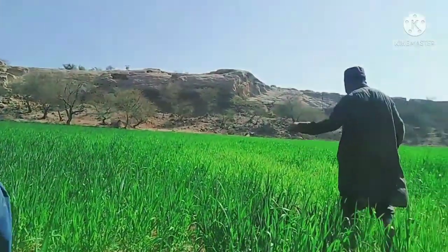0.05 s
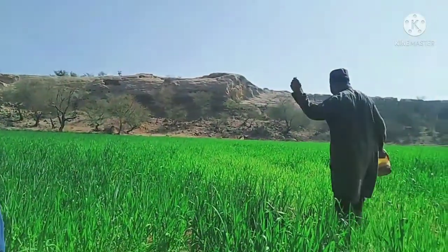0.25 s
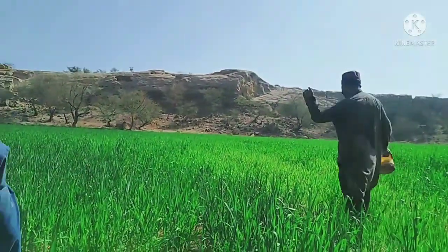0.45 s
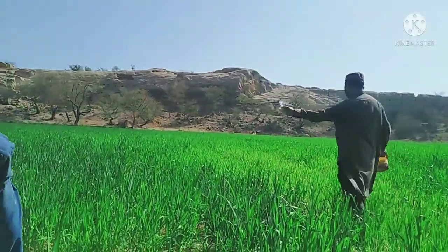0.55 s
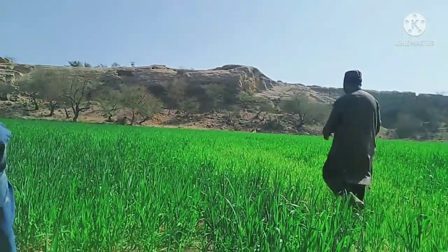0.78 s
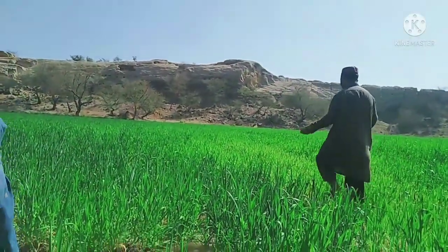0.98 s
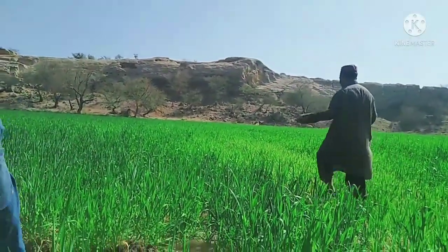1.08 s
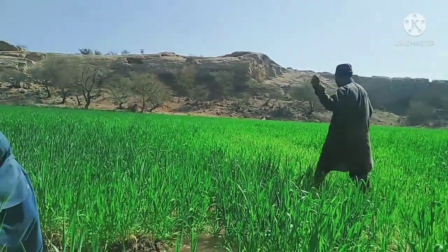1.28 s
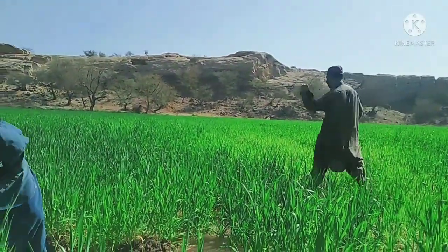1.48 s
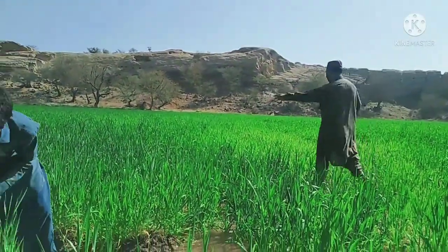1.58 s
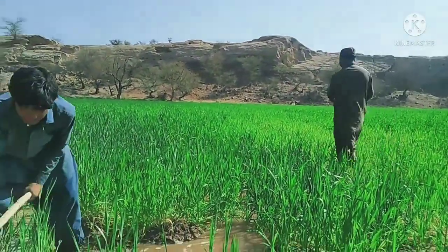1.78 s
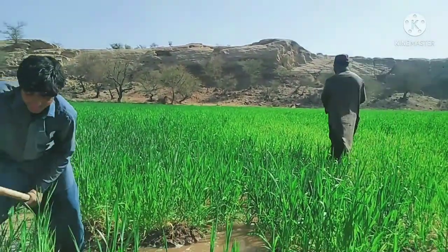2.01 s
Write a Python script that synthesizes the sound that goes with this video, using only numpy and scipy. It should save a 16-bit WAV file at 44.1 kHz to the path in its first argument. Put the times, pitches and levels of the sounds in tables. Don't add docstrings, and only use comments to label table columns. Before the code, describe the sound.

A hoe chops into wet mud in an open field. Faint hiss, stalk rustle and blade drag open; at 0.2 s a crisp, gritty blow with a short metallic ring. Small clods plop at 0.4-0.6 s, then soft scraping and rustling. At 1.35 s a duller, wetter chop lands, with splats and snaps near 1.42 and 1.7 s, fading into rustle by 2 s. Close, dry, no echo.

```python
import sys
import numpy as np
from scipy import signal
from scipy.fft import rfft, irfft
from scipy.io import wavfile
from scipy.ndimage import uniform_filter1d

SR = 44100
rng = np.random.default_rng(int(sys.argv[2]) if len(sys.argv) > 2 else 0)


def volts_from_decibels(level):
    exponent = np.asarray(level, float) / 20
    return 10 ** exponent


def materialize(psi):
    bounded = np.clip(np.atleast_2d(psi).T, -1, 1)
    quanta = np.round(bounded * 32767).astype(np.int16)
    wavfile.write(sys.argv[1], SR, quanta)


N = 90404

# (frequency [Hz], density [dB per Hz])
AIR_SPECTRUM = [(20, 23), (45, 2.5), (90, 7), (300, -3), (1000, -5), (2000, -24), (5000, -28), (16000, -12)]
AIR_DB = -61.5

# (time [s], rustle level [dB], scrape level [dB], scrape pitch [Hz])
MOVEMENT = [(0, -59, -66.5, 1280), (.05, -67, -69, 1520), (.3, -70, -87, 1510), (.42, -68.5, -74.5, 1530),
            (.55, -63.5, -74.5, 1515), (.63, -67, -65, 1800), (.7, -70.5, -65, 2050),
            (.8, -57.5, -69, 2570), (.95, -59.5, -66.5, 2500), (1.08, -64.5, -65.5, 1760),
            (1.171, -72.5, -66.5, 1700), (1.25, -72, -79, 1770), (1.34, -80, -74.5, 1780),
            (1.4, -61, -64, 1800), (1.63, -58, -63, 1800), (1.73, -64.5, -71.5, 1400),
            (1.8, -56.5, -73, 1500), (2.05, -63.5, -110, 1508)]
# (time [s], level [dB])
HOLLOW_LEVEL = [
    (0, -70),
    (.2, -76),
    (.35, -85),
    (.62, -70.5),
    (.8, -70),
    (1.1, -73),
    (1.25, -86),
    (1.45, -73),
    (1.7, -74),
    (2.05, -88),
]
# (frequency [Hz], density [dB per Hz])
RUSTLE_SPECTRUM = [(60, 4), (300, -11.5), (700, 1), (2000, -0.5), (5000, -4), (10000, -1.5), (16000, -2.5)]
SCRAPE_WIDTH_HZ, HOLLOW_HZ, HOLLOW_WIDTH_HZ = 1650, 559, 41
CORE_WIDTH_HZ, CORE_DB = 96, -5.5
WAVER, SWAY_DB, SWAY_S = 0.042, 1.5, 0.026

# (time [s], peak level [dB], pitch [Hz],
# length [cycles])
TICKS = [(0.0374, -39, 14500, 10), (0.187, -35, 10200, 10), (0.6667, -33.5, 2300, 0.7),
         (0.63, -42, 1620, 1.2), (0.6937, -39, 1660, 6.2), (0.741, -46.5, 1800, 3.7),
         (1.5724, -31, 4700, 2.1), (1.6832, -29.5, 1320, 1.02), (1.6662, -38, 1700, 3),
         (1.7034, -34, 440, .8), (1.364, -27, 1900, 4), (1.3502, -13, 2630, 1), (.2525, -45, 2400, 2),
         (.2076, -14, 1900, 2.5), (1.7036, -40, 1700, 2), (.4675, -41, 2250, 8), (.4655, -44, 3350, 9),
         (.4235, -39, 1200, 4), (.424, -46, 3900, 10), (1.878, -41.5, 7500, 3.9), (.4575, -40, 2400, 1.8),
         (1.8621, -32.5, 4160, 3.1), (1.922, -49.5, 1480, 4.4), (2.001, -47.5, 2230, 1.8),
         (1.4185, -35, 8100, 11), (1.4198, -33, 7500, 14), (1.4482, -32.5, 8250, 16), (1.422, -39, 1800, 9),
         (1.4225, -34.5, 3140, 10), (1.7034, -31.5, 7600, 4.7)]

# (time [s], peak level [dB], lower edge [Hz], T60 [s])
SNAPS = [(0.0379, -44, 3500, 0.005), (0.0963, -45, 1000, .004), (0.1348, -46, 3000, 0.0045),
         (0.1874, -38, 7000, 0.034), (0.727, -38.5, 8100, 0.006), (0.9064, -35, 4500, 0.0093),
         (1.38, -30.5, 4010, 0.0097), (1.6028, -29, 3770, 0.005), (1.6833, -28.5, 4000, 0.004),
         (1.7035, -48, 301, 0.0039), (1.4185, -25, 4500, 0.01), (1.4480, -27, 4000, 0.012),
         (.4567, -36.5, 2000, 0.0086), (1.8265, -39, 6070, 0.006)]
SNAP_TOP_HZ = 14500

# (time [s], level [dB], rise [s], hold [s], T60 [s])
BLOWS = [
    (.2074, -23.5, 0.0014, 0.00082, 0.025),
    (1.3470, -25, 0.0024, 0.0086, 0.026),
]
# (level [dB], T60 [s])
AFTER_SPRAY = [
    (-32, 0.11),
    (-43.5, 0.45),
]
# (frequency [Hz], density [dB per Hz])
GRIT_SPECTRUM = [(100, 20), (500, 17), (2000, 9), (5000, 2.5), (10000, 0), (16000, -5)]
# (frequency [Hz], level [dB], T60 [s])
FIRST_MODES = [(105, 0, 0.04), (330, 1.5, 0.071), (454.5, 1, 0.063), (651, 0, 0.073), (917, -5.5, 0.039),
               (1116, 0, 0.045), (1222, 2, 0.047), (1595, -5, 0.04), (1820, -5, 0.043), (2000, -8, 0.049),
               (2286, -8, .04), (2465, -10, 0.042), (3080, -6.5, 0.029), (3923, 7.5, 0.018)]
# (frequency [Hz], level [dB], T60 [s])
SECOND_MODES = [(105, -10, 0.06), (177, -1, 0.092), (279, -1, 0.055), (357, -3, 0.063), (425, -11, 0.048),
                (590, -9, 0.035), (650, -8, 0.042), (720, -10, 0.043), (830, -10, 0.035),
                (1089, -8.5, 0.039), (1770, -14, 0.048), (2060, -17.5, 0.065), (2967, -7, 0.026),
                (4700, -17, 0.018)]
# (frequency [Hz], level [dB], T60 [s])
BLADE_MODES = [
    [(7200, -61, .03), (7250, -27, 0.022), (8550, -17.5, 0.0077), (14210, -14, 0.008), (15500, -18, .008),
     (13300, -21, 0.011), (10380, -29.5, 0.016)],
    [(7310, -33, 0.02), (7700, -25, 0.019), (8840, -45, 0.012), (14300, -41, 0.013), (2330, -34, .025),
     (3390, -28.5, 0.035), (3870, -30, .025), (5080, -28, 0.021), (6240, -27, 0.022), (8160, -28, 0.019)],
]
MODE_LAG_S = [.0005, .0028]
MODES_DB, PUSH_S = [-26.5, -19], [0.00096, 0.002]
IN_STEP_BELOW_HZ = 800

# (time [s], level [dB], pitch [Hz], rise [s], T60 [s])
KNOCKS = [(.214, -34.5, 201, 0.0048, 0.23), (0.1977, -49, 3920, 0.001, 0.018),
          (1.3580, -30, 278, 0.0024, 0.03), (1.375, -34, 379, .004, 0.059),
          (.418, -39.5, 186, 0.0054, 0.067), (0.474, -52, 204, 0.014, 0.3),
          (0.585, -51.5, 154.6, 0.0048, 0.22), (.68, -60, 205.4, 0.066, 0.56),
          (1.419, -28, 173, 0.0079, 0.04), (1.445, -35, 156, 0.0029, 0.072),
          (1.469, -58.5, 159.6, 0.053, 0.89), (1.48, -66, 388, .02, 1), (1.662, -41.5, 101, 0.0046, 0.049),
          (1.79, -39.5, 390, 0.012, 0.039)]

# (time [s], length [s], mud body level [dB], spray level [dB], body pitch [Hz])
CLODS = [(0.4156, 0.019, -51.5, -51, 596), (0.432, 0.023, -55.5, -57, 800), (0.4975, .003, -61, -62, 900),
         (0.422, 0.0071, -46.5, -59, 890), (0.4561, 0.0055, -51.5, -49.5, 700),
         (0.4626, 0.0093, -50.5, -51.5, 1540), (0.47, 0.016, -53, -54, 1154),
         (0.5876, 0.019, -61.5, -58, 1090), (0.574, 0.029, -73, -61, 930),
         (0.601, 0.011, -58.5, -57.5, 1200), (.609, 0.015, -63.5, -54.5, 1300),
         (0.612, 0.021, -56.5, -80, 448), (1.382, 0.0037, -63, -64, 1500),
         (1.419, 0.0073, -46.5, -50, 2300), (1.417, 0.015, -44.5, -55, 480), (1.4408, .005, -58, -50, 1490),
         (1.4477, 0.0077, -44, -41.5, 907), (1.455, 0.01, -55, -56, 905), (1.641, 0.023, -58, -68, 890),
         (1.654, 0.01, -61, -65, 1400), (1.665, 0.016, -55, -66, 1200), (1.464, 0.15, -63, -70, 278),
         (1.704, 0.013, -50.5, -58, 506), (1.779, 0.031, -57.5, -62, 467)]
# (frequency [Hz], width [Hz], level [dB])
SPLAT_BANDS = [(1200, 140, -3), (2160, 210, -2), (3290, 300, -6.5), (4000, 220, -7.5)]
# (frequency [Hz], density [dB per Hz])
SPLAT_SPECTRUM = [(100, 16), (500, 17), (2000, 6.5), (4000, -1.5), (5000, 0), (10000, 1.5), (16000, -4)]
ATTACK_S = 0.0012
GRAIN_DB, GRAINS_PER_S = 0.5, 5000
POCKET_SPREAD, POCKET_WIDTH, POCKET_DB = 1.118, 0.038, -1

# (frequency [Hz], level [dB])
MIC_RESPONSE = [(4200, -1.5), (5500, -3), (6800, 4), (8100, 10), (9300, 1), (11500, -4), (14600, 3.5),
                (15600, 8)]
EDGE_HZ, ABOVE_EDGE_DB = 15600, -42


def evened(x):
    return x / np.sqrt(np.mean(x ** 2) + 1e-20)


def coloured(x, points):
    hz, db = np.transpose(points)
    bins = np.fft.rfftfreq(8192, 1 / SR)
    log_gain = np.log(volts_from_decibels(np.interp(np.log(bins + 1), np.log(hz + 1), db)))
    cepstrum = irfft(log_gain)
    folded = np.r_[cepstrum[0], 2 * cepstrum[1:4096], np.zeros(4096)]
    impulse = irfft(np.exp(rfft(folded)))[:4096]
    return signal.oaconvolve(x, impulse)[:len(x)]


def resonate(x, hz, width):
    turn = np.exp(2j * np.pi * np.cumsum(hz * np.ones(len(x))) / SR)
    r = np.exp(-np.pi * width / SR)
    return 2 * (turn * signal.lfilter([1 - r], [1, -r], x / turn)).real


def add(mix, s, sound):
    part = mix[round(s * SR):][:len(sound)]
    part += sound[:len(part)]


def grains(per_s, spread_db):
    size_db = spread_db * np.minimum(rng.exponential(1, N), 4)
    size = volts_from_decibels(size_db) * rng.standard_normal(N)
    return evened(size * (rng.random(N) < per_s / SR))


def rings(t, modes):
    total = 0
    for j, (hz, db, t60) in enumerate(modes):
        sign = 1 if hz < IN_STEP_BELOW_HZ else (-1) ** j
        total = total + sign * volts_from_decibels(db - 60 * t / t60) * np.sin(2 * np.pi * hz * t)
    return total


def air():
    return volts_from_decibels(AIR_DB) * evened(coloured(rng.standard_normal(N), AIR_SPECTRUM))


def movement():
    t = np.arange(N) / SR
    s, rustle_db, scrape_db, hz = np.transpose(MOVEMENT)
    pitch = np.interp(t, s, hz)
    rustle = evened(coloured(grains(30000, spread_db=1), RUSTLE_SPECTRUM))
    rub = grains(20000, spread_db=1.5)

    def slow(x):
        span = round(SWAY_S * SR)
        return evened(uniform_filter1d(uniform_filter1d(x, span), span))

    sway, wobble = slow(rub[::-1]), slow(rub)
    rustle = rustle * volts_from_decibels(SWAY_DB * sway)
    scrape = evened(resonate(rub, pitch, SCRAPE_WIDTH_HZ))
    core = evened(resonate(rub, pitch * (1 + WAVER * sway), CORE_WIDTH_HZ))
    scrape = scrape + volts_from_decibels(CORE_DB) * core
    hollow = evened(resonate(rub, HOLLOW_HZ * (1 + WAVER * wobble), HOLLOW_WIDTH_HZ))
    hollow = volts_from_decibels(np.interp(t, *np.transpose(HOLLOW_LEVEL))) * hollow
    return volts_from_decibels(np.interp(t, s, rustle_db)) * rustle + volts_from_decibels(np.interp(t, s, scrape_db)) * scrape + hollow


def ticks():
    out = np.zeros(N)
    for s, db, hz, cycles in TICKS:
        u = np.arange(0, 3 * cycles / hz, 1 / SR) * hz / cycles
        envelope = 6 * u * np.exp(-3.5 * u)
        add(out, s, volts_from_decibels(db) * envelope * np.sin(2 * np.pi * cycles * (u + 0.0072 * u ** 2)))
    return out


def snaps():
    out, t = np.zeros(N), np.arange(600) / SR
    crackles = rng.standard_normal((len(SNAPS), 600))
    for (s, db, hz, t60), crackle in zip(SNAPS, crackles):
        burst = ((t == 0) * 2 + 0.35 * crackle) * volts_from_decibels(db - 60 * t / t60)
        band = signal.butter(2, [hz, SNAP_TOP_HZ], "band", fs=SR)
        add(out, s, signal.lfilter(*band, burst))
    return out


def blows():
    out, t = np.zeros(N), np.arange(SR // 2) / SR
    grit = evened(coloured(rng.standard_normal(N), GRIT_SPECTRUM))
    for k, modes in enumerate([FIRST_MODES, SECOND_MODES]):
        s, db, rise, hold, t60 = BLOWS[k]
        spray_db, spray_t60 = AFTER_SPRAY[k]
        burst = volts_from_decibels(db - 60 * np.maximum(t - rise - hold, 0) / t60)
        spray = volts_from_decibels(spray_db - 60 * t / spray_t60)
        onset = np.minimum(t / rise, 1) ** 3
        add(out, s, onset * (burst + spray) * grit[k * SR // 2:][:len(t)])
        push = np.minimum(t / PUSH_S[k], 1)
        ringing = volts_from_decibels(MODES_DB[k]) * rings(t, modes) + rings(t, BLADE_MODES[k])
        add(out, s + MODE_LAG_S[k], push * ringing)
    return out


def knocks():
    out, t = np.zeros(N), np.arange(SR // 2) / SR
    for s, db, hz, rise, t60 in KNOCKS:
        add(out, s, (1 - np.exp(-t / rise)) * rings(t, [(hz, db, t60)]))
    return out


def clods():
    out = np.zeros(N)
    wet = grains(GRAINS_PER_S, GRAIN_DB) + 0.29 * rng.standard_normal(N)
    drops = grains(30000, spread_db=1.5)
    spray = evened(coloured(drops, SPLAT_SPECTRUM))
    for hz, width, db in SPLAT_BANDS:
        spray = spray + volts_from_decibels(db - 9) * evened(resonate(drops, hz, width))
    chance = rng.uniform(-1.054, 1, (len(CLODS), 5))
    for (s, length, body_db, spray_db, hz), picks in zip(CLODS, chance):
        t, at = np.arange(0, 3 * length, 1 / SR), round(s * SR)
        shape = np.minimum(t / ATTACK_S, 1) * volts_from_decibels(-9 * (t / length) ** 2)
        lump = wet[at:][:len(t)] * shape
        body = resonate(resonate(lump, hz, 1.16 * hz), hz, 1.16 * hz)
        pocket_hz = hz * np.exp(POCKET_SPREAD * picks)
        pockets = sum(evened(resonate(lump, f, POCKET_WIDTH * f)) for f in pocket_hz)
        mud = evened(body) + volts_from_decibels(POCKET_DB) * evened(pockets)
        add(out, s, volts_from_decibels(body_db) * np.sqrt(np.mean(shape ** 2)) * mud)
        add(out, s, volts_from_decibels(spray_db) * shape * spray[at:][:len(t)])
    return out


def scene():
    return (air() + movement() + ticks() + snaps() + blows() + knocks() + clods())[None]


def low_pass(x):
    return signal.sosfilt(signal.butter(12, 16810, fs=SR, output="sos"), x)


def record(dry):
    heard = coloured(dry[0], MIC_RESPONSE)
    edge = signal.firwin(801, EDGE_HZ, window=("kaiser", 9), fs=SR)
    low = signal.oaconvolve(heard, edge, "same")
    mix = low + volts_from_decibels(ABOVE_EDGE_DB) * (heard - low)
    return low_pass(mix[None])


dry = scene()
out = record(dry)
materialize(out)
```